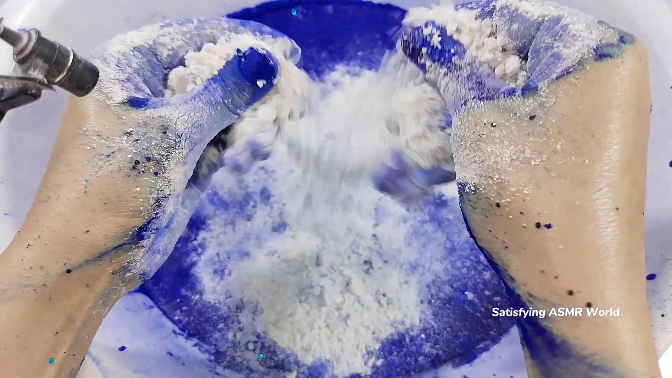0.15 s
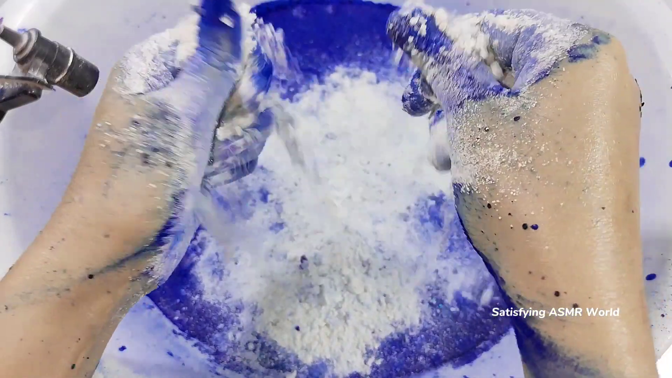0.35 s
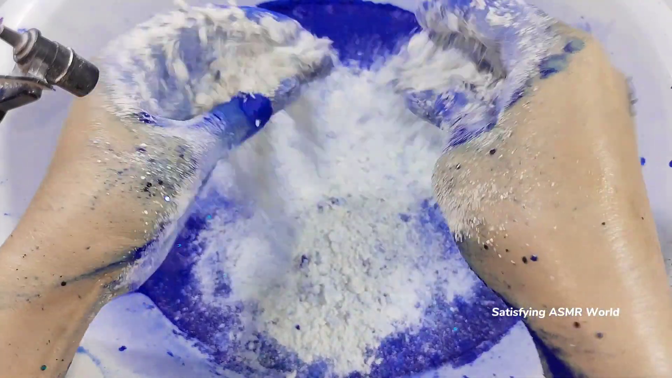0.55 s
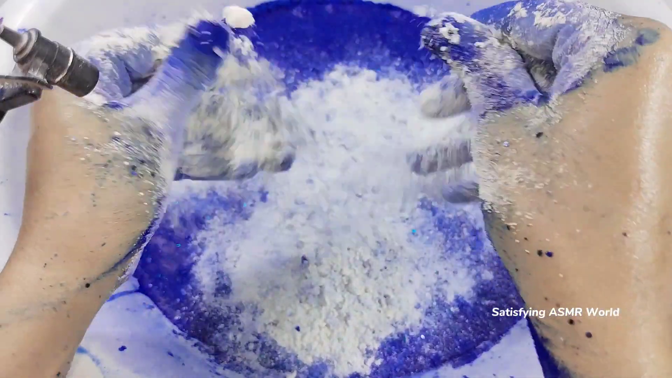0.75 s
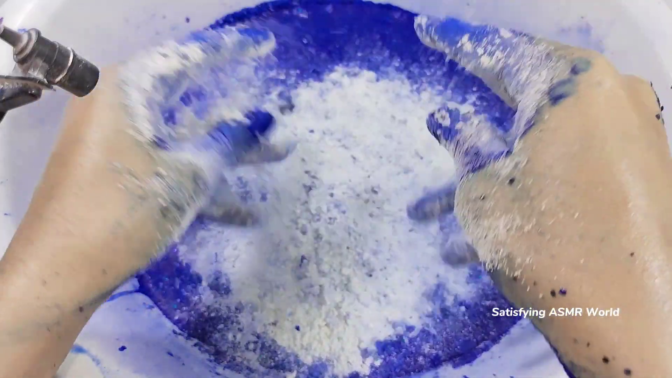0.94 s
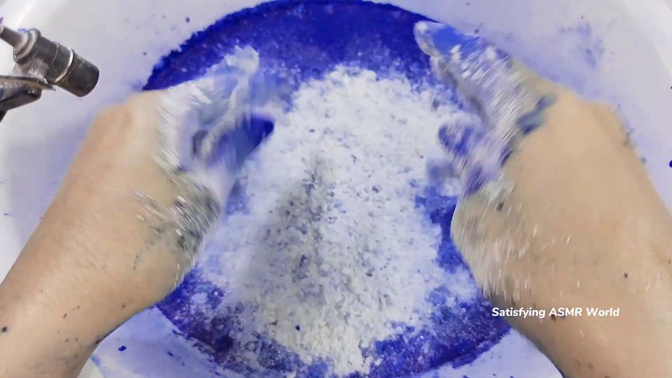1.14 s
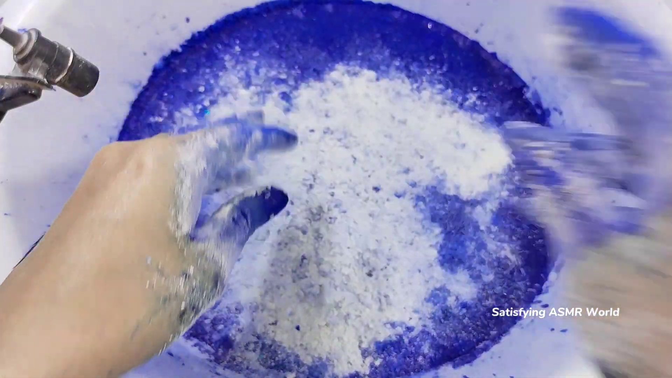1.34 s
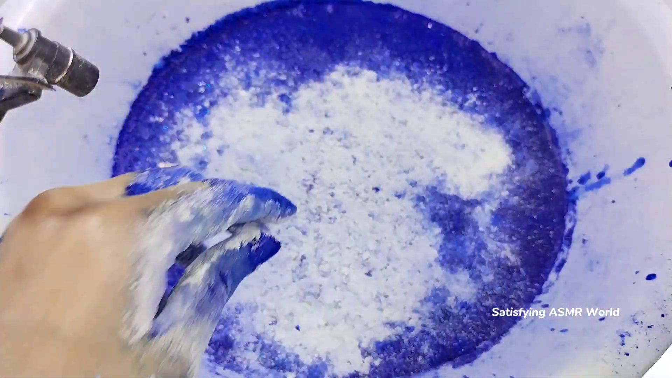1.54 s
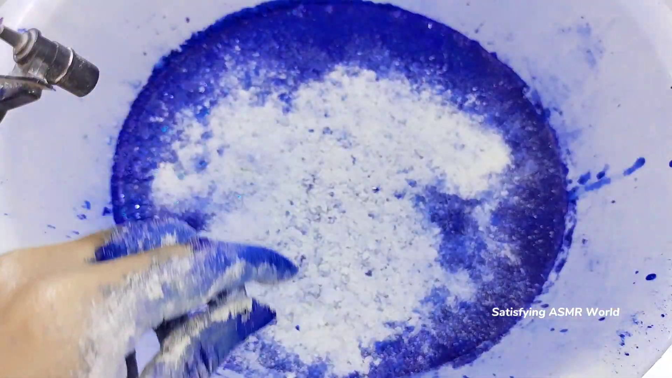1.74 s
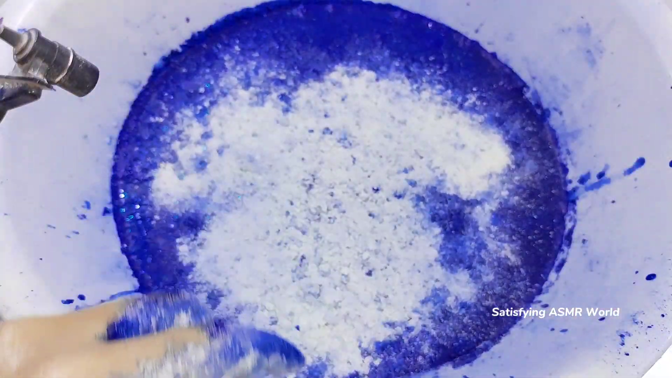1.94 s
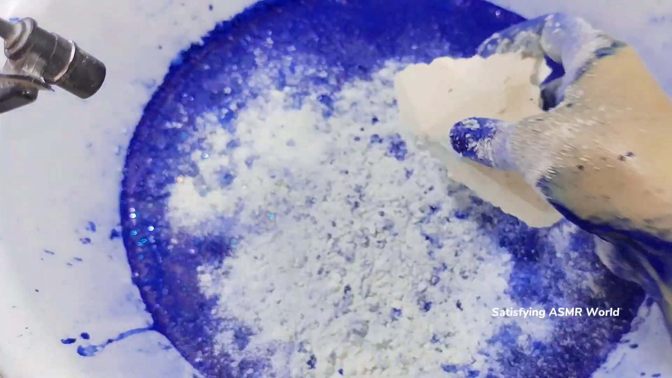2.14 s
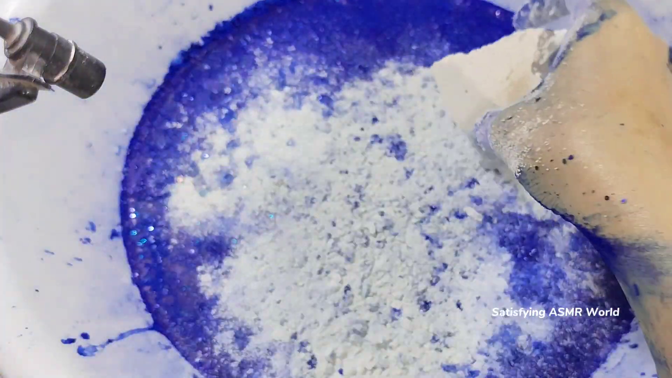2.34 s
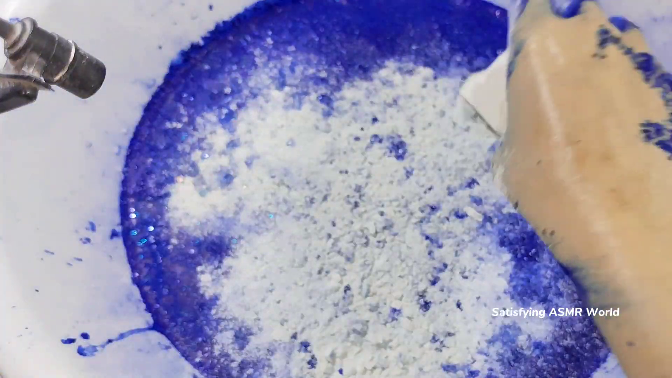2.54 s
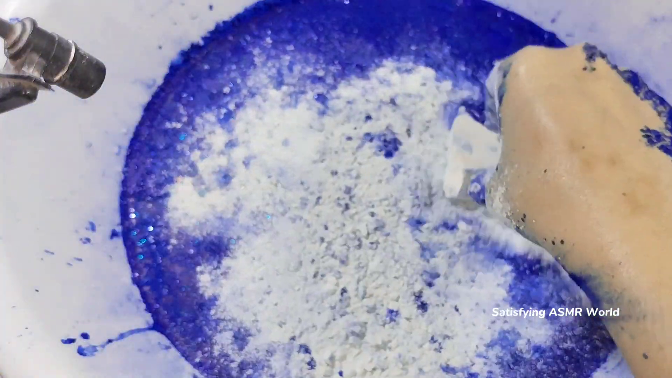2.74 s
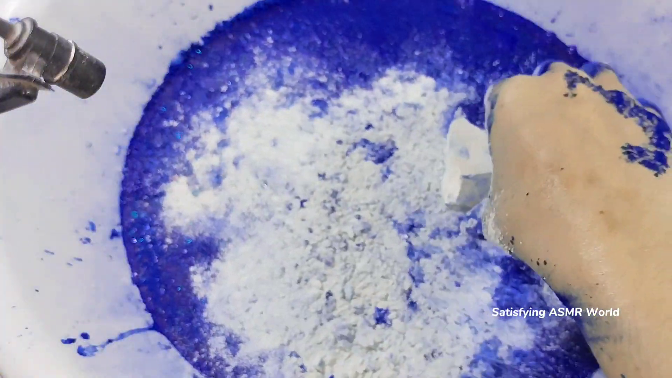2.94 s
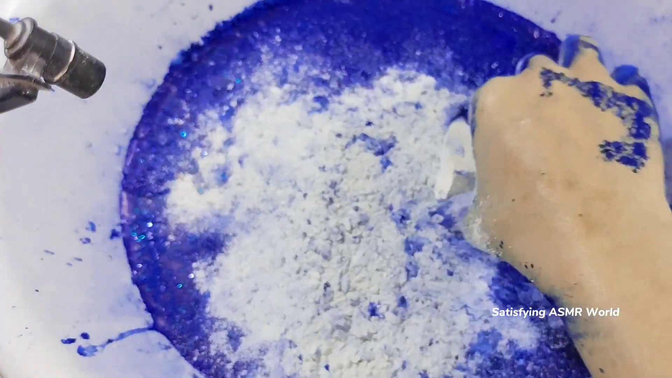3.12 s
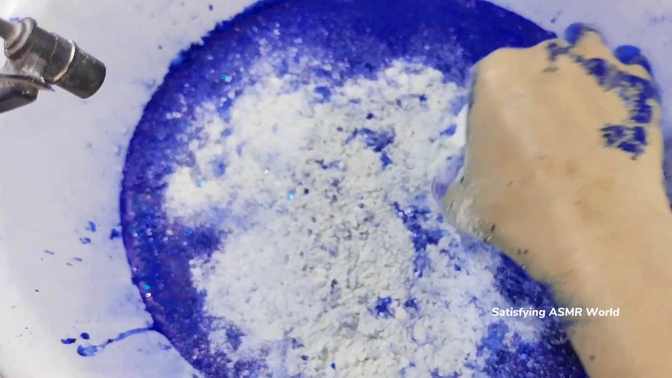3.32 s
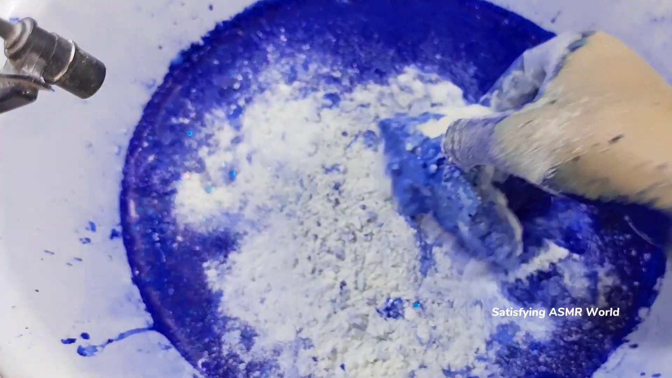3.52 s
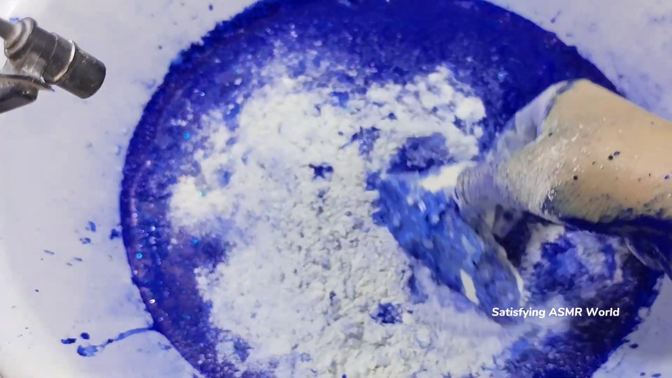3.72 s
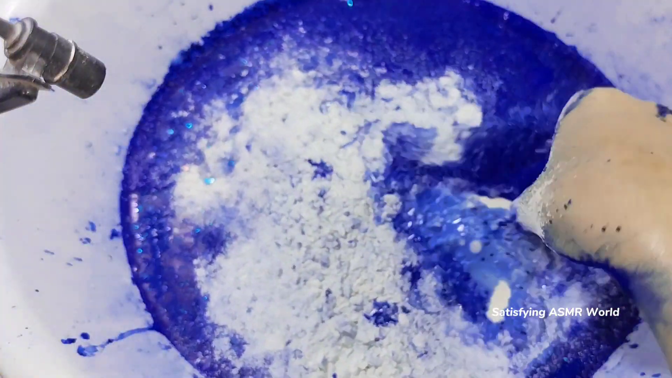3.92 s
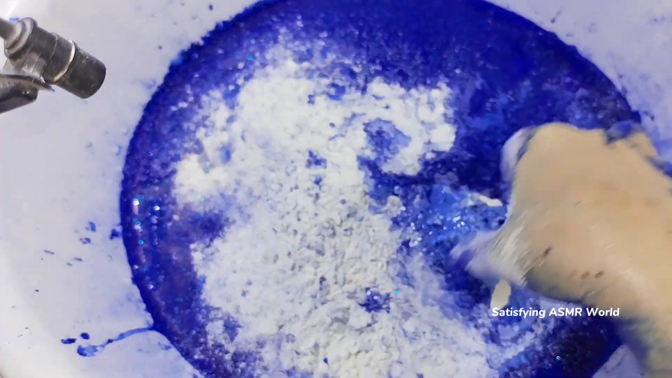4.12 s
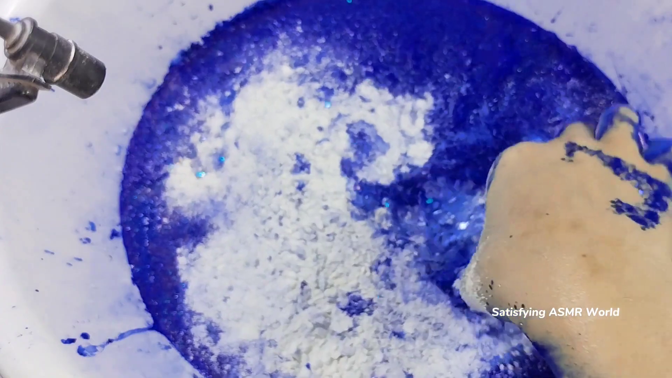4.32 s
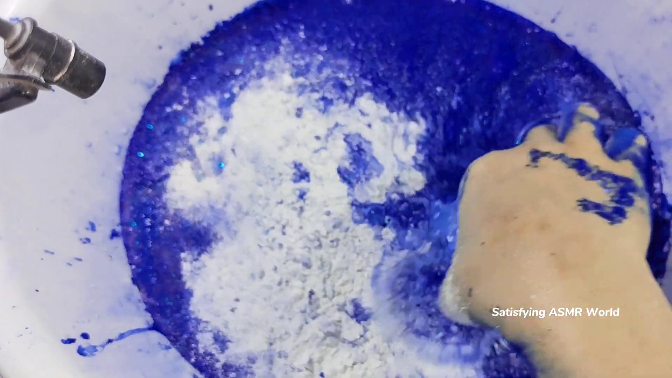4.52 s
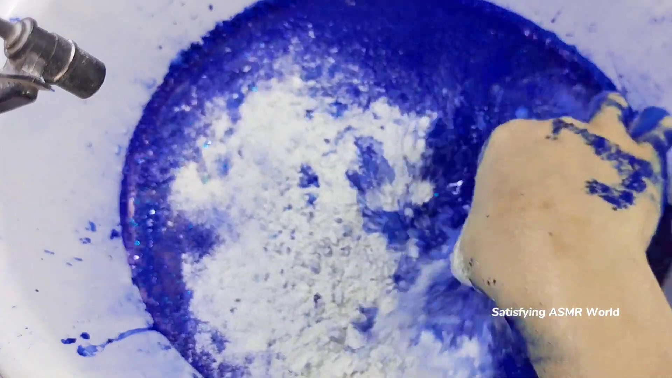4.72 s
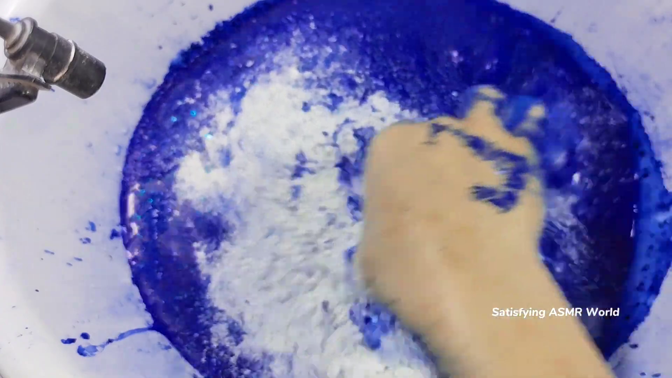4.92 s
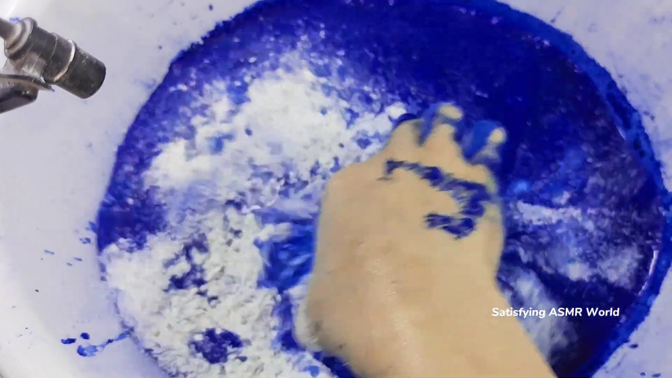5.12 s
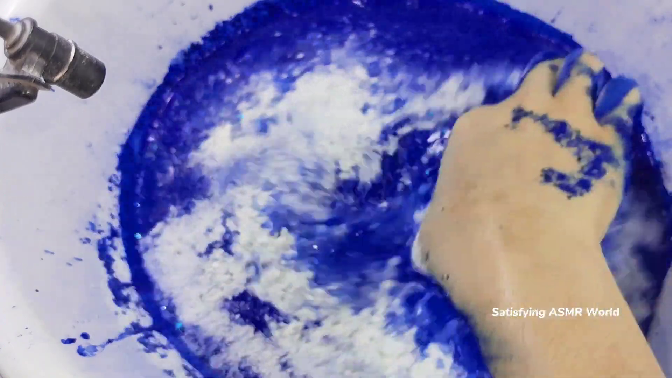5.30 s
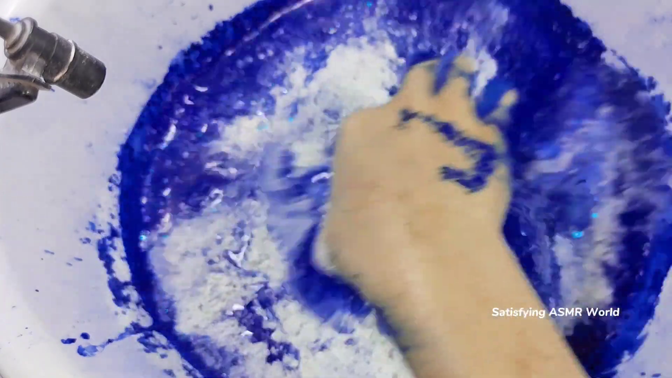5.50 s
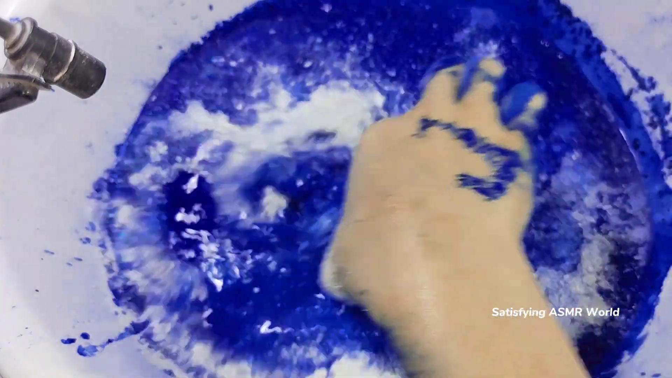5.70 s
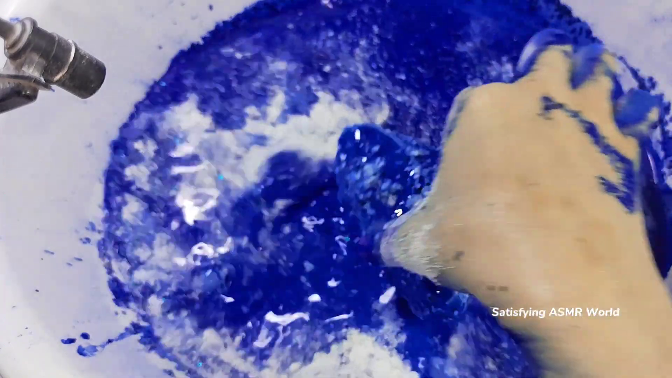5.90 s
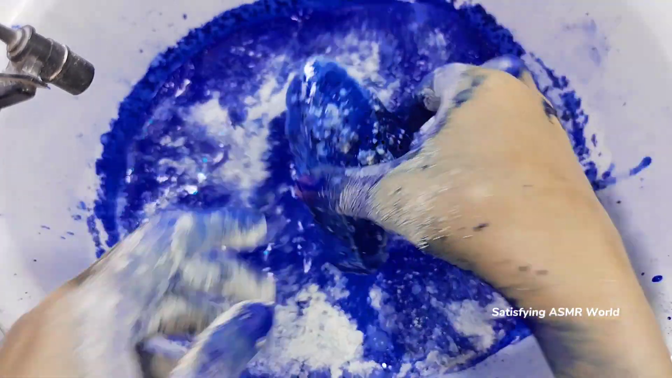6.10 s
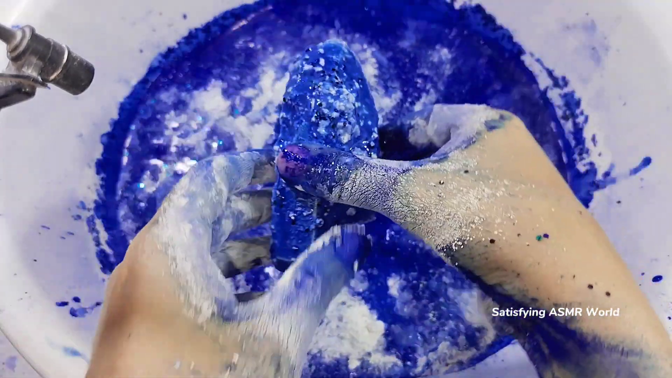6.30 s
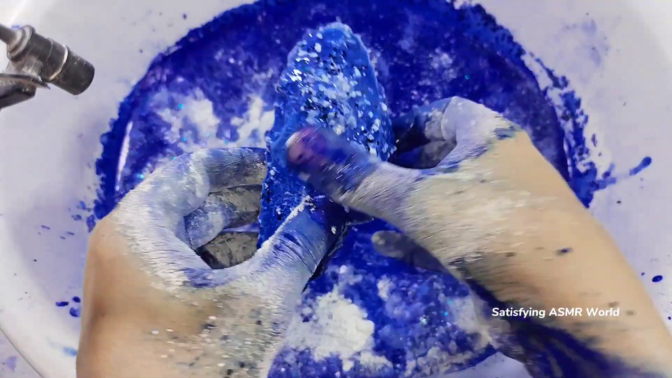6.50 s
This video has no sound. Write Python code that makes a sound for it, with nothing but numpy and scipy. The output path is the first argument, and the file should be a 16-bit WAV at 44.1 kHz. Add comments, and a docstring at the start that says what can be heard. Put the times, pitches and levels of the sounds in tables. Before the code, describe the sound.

Recorded very close in a small hard room with a short echo and faint low room tone. From 0 to 1.3 s, two hands crush soft damp chalk: dense, bright, gritty crunches in about eight overlapping squeezes, with sharp snaps, small pops and low rumble as lumps drop; the strongest crack is near 1.2 s. It falls almost quiet, with a faint powdery hiss and a dull soft knock at 1.6 s. From 2.0 s a block rubs through powder in hissing, rasping strokes, strongest around 2.2 s, with faint breathy squeaks. Low basin thuds come around 2.95 s and 3.35 s, then wet squelches and scrapes until about 4.2 s. After a lull, water sloshes and gurgles from 4.6 s, with a bright pop at 5.0 s, thinning into fizzing, crackling swishes. Sharp wet clicks stand out around 6.15 s, and fine crackle fades to the end.

```python
"""Soft wet chalk crunches between two hands, then a block hisses and squeaks through powder, bumps the
bottom of a plastic basin and is swished about in water that fizzes and pops, close by in a small hard room.
Chalk, powder and froth are many tiny damped rings, swelled and coloured push by push.
Cracks and air pockets are short rings with noisy bursts; the basin is a set of ringing tones plus rumble.
A short echo and a quiet room tone lie behind."""
import sys
import numpy as np
from scipy import signal
from scipy.fft import rfft, irfft
from scipy.io import wavfile
from scipy.ndimage import uniform_filter1d

SR = 44100
rng = np.random.default_rng(int(sys.argv[2]) if len(sys.argv) > 2 else 0)


def wav_out(sig):
    """Save sig, one row per channel (or a flat mono array), as 16-bit PCM at SR to the path in sys.argv[1]."""
    wavfile.write(sys.argv[1], SR, np.round(np.clip(np.atleast_2d(sig).T, -1, 1) * 32767).astype(np.int16))


N = 288855
TIME = np.arange(N) / SR


def crumbling():
    """Dense, crisp fractures and a few larger crumbs breaking as the lumps give way between the fingers."""
    # colour of the crunch: f/Hz, level/dB
    crumble_tone = [(210, -27), (350, -18), (458, -11.5), (591, -1), (798, -10), (966, -6.5), (1210, -14),
                    (1850, -5), (3660, -7), (4220, -3.5), (9940, -10.5), (14300, -12.5), (15500, -12.5)]
    # squeezes of the lumps, before the trim: start t/s, rise/s, hold/s, fade t60/s, crunch level/dB,
    # fine grit level/dB
    squeezes = [(0.0, 0.004, 0.085, 0.4, -35, -34), (0.089, 0.099, 0.066, 0.84, -32.5, -34),
                (0.329, 0.075, 0.13, 0.15, -36.5, -35), (0.538, 0.015, 0.13, 0.41, -39.5, -39),
                (0.691, 0.045, 0.048, 0.72, -34, -33), (0.817, 0.052, 0.02, 0.42, -36.5, -36.5),
                (0.976, 0.021, .16, 0.46, -36, -33), (1.225, 0.036, 0.02, 0.42, -50, -49.5),
                (1.231, 0.03, 0.0046, 0.043, -41.5, -29.5)]
    low_edge_hz = 388  # lower edge of the crunch
    trim_db = -0.18
    fractures = grains(per_s=7000, spread_db=3.5, cycles=2.2, glide=0, wash=0.79)
    crumbs = grains(per_s=280, spread_db=4.5, cycles=1.8, glide=0, wash=0, count=16)
    crunch = clumped(fractures + 0.5 * crumbs, depth_db=2.5, size=300)
    pushes = [(*squeeze, low_edge_hz) for squeeze in squeezes]
    return gain_of(trim_db) * stroke(crunch, crumble_tone, pushes, linger=1.0, split_hz=3970,
                                     patchy_db=2.5, edge_db=-8.0)


def rubbing():
    """Fine powder hisses along the block; wet paste squelches as it is squeezed aside beneath."""
    # colours of the rub and of the paste: f/Hz, level/dB
    rub_tone = [(710, -45), (1200, -4), (1650, -8.5), (1840, -10), (2030, -3), (2380, -10), (2510, -4.5),
                (3210, -4), (3850, -1.5), (5790, 0.5), (15500, -9)]
    squelch_tone = [(150, -29), (260, -14), (302, -5), (414, 4), (620, 8), (880, 3), (980, 5.5),
                    (1300, -23), (1690, -28), (2860, -120)]
    # slides through the powder, before the trim: start t/s, rise/s, hold/s, fade t60/s, rasp level/dB,
    # hiss level/dB, lower edge of the sound f/Hz; the hiss fades more slowly, by the factor linger
    slides = [(1.335, 0.013, 0.035, 0.52, -68, -49.5, 3800), (1.462, 0.017, 0.17, 0.2, -57.5, -54, 2580),
              (1.995, 0.023, 0.035, 0.39, -44, -43, 1620), (2.1, 0.1, 0.072, 0.27, -31.5, -34, 1440),
              (2.341, 0.017, .01, 0.57, -44.5, -43.5, 2130), (2.616, .012, 0.0067, 0.13, -58, -53.5, 2370),
              (2.65, 0.033, 0.009, 0.75, -42, -40.5, 2030), (2.747, 0.047, 0.0092, 0.29, -35, -34.5, 2110),
              (2.929, .02, 0.07, 0.17, -46.5, -46, 2314), (3.327, 0.072, 0.0048, 0.087, -35.5, -31.5, 1670),
              (3.403, 0.044, .01, 0.41, -41.5, -41.5, 1550),
              (3.586, 0.045, 0.013, 0.21, -35.5, -35.5, 1950),
              (3.697, 0.031, 0.17, 0.24, -50.5, -49.5, 2360), (3.91, 0.0077, 0.089, 0.34, -40, -38, 1040),
              (3.944, 0.037, .004, 0.051, -56, -30, 1190), (4.23, 0.0095, 0.0088, .22, -56.5, -69, 4200),
              (4.33, 0.023, 0.045, 0.29, -57, -52, 3230), (4.563, 0.01, .03, 0.4, -56, -51.5, 2760)]
    # squelches of the paste, before the trim: start t/s, rise/s, hold/s, level/dB
    squelches = [(2.755, 0.013, 0.028, -49.5), (2.825, 0.015, 0.042, -45.5), (3.34, .008, 0.11, -38.5),
                 (3.905, 0.027, .04, -44.5), (3.985, 0.011, 0.064, -38), (4.75, 0.16, .03, -38)]
    squelch_t60 = 0.2  # s
    rasp_trim_db, paste_trim_db = -1.97, -7.5
    grit = grains(per_s=3500, spread_db=3.0, cycles=2.6, glide=0, wash=1.14)
    paste = grains(per_s=2200, spread_db=1.5, cycles=6.1, glide=0.024, wash=0.68)
    squelch = tinted(paste, squelch_tone) * swells(squelches, squelch_t60)
    rasp = stroke(grit, rub_tone, slides, linger=1.37, split_hz=4230, patchy_db=5.0, edge_db=10.5)
    return gain_of(rasp_trim_db) * rasp + gain_of(paste_trim_db) * squelch


def squeaks():
    """The block sticks and slips lightly; narrow bands of noise give a faint, fuzzy whistle."""
    # squeaks: start t/s, level/dB, pitch f/Hz, length/s
    squeak_list = [(1.388, -44, 3980, 0.023), (2.328, -49.5, 2550, 0.24), (3.227, -55, 1853, 0.28),
                   (3.889, -41, 2810, 0.024), (4.453, -59, 1635, 0.085)]
    out = np.zeros(N)
    for start, db, hz, length in squeak_list:
        age = np.clip((TIME - start) / length, 0, 1)
        whistle = evened(band(rng.standard_normal(N), 0.95 * hz, 1.05 * hz))
        # a quick rise and a slow fall
        out += gain_of(db) * whistle * np.sin(np.pi * age ** 0.28)
    return out


def water():
    """Clumps of wet crackle, stray ticks and small bubbles, each rising in pitch as it surfaces."""
    # colour of the slosh and fizz: f/Hz, level/dB
    slosh_tone = [(210, -64), (350, -37), (437, 3.5), (488, -20), (591, 9), (715, -4), (851, 1),
                  (1170, -9.5), (1330, -5.5), (1910, -0.5), (2420, -8), (6580, -12), (15500, -23)]
    # swishes and spells of draining, before the trim: start t/s, rise/s, hold/s, slosh level/dB,
    # fizz level/dB, lower edge of the sound f/Hz
    swishes = [(4.63, 0.028, 0.0061, -41, -50.5, 486), (4.704, 0.045, 0.11, -35.5, -47.5, 372),
               (4.895, 0.038, 0.16, -45, -43, 404), (5.101, 0.086, 0.019, -45.5, -40, 584),
               (5.235, 0.071, 0.098, -55, -45, 2070), (5.359, 0.011, 0.0073, -39, -44, 505),
               (5.432, 0.021, 0.015, -47.5, -44.5, 525), (5.513, 0.035, 0.041, -52, -38.5, 900),
               (5.627, .015, 0.042, -44.5, -41.5, 694), (5.753, 0.022, 0.0066, -42.5, -37.5, 830),
               (5.858, 0.057, 0.048, -60, -44.5, 1380), (5.983, 0.037, 0.29, -58, -42.5, 2080),
               (6.35, 0.11, .17, -57, -45.5, 4330)]
    slosh_t60, fizz_linger = 0.27, 2.97  # slosh fade in s; the fizz fade is so many times longer
    trim_db = -1.0
    crackle = grains(per_s=2000, spread_db=2.0, cycles=2.7, glide=0, wash=1.0)
    ticks = grains(per_s=160, spread_db=2.0, cycles=4.3, glide=0, wash=0)
    bubbles = grains(per_s=750, spread_db=1, cycles=9.3, glide=0.033, wash=0)
    froth = clumped(crackle + 0.6 * ticks + 0.28 * bubbles, depth_db=1.5, size=420)
    pushes = [(start, rise, hold, slosh_t60, slosh_db, fizz_db, low_edge_hz)
              for start, rise, hold, slosh_db, fizz_db, low_edge_hz in swishes]
    return gain_of(trim_db) * stroke(froth, slosh_tone, pushes, linger=fizz_linger, split_hz=2640,
                                     patchy_db=3.8, edge_db=-5.0)


def snaps():
    """A sharp crack excites a heavily damped cavity, too small to radiate far below its pitch."""
    # brittle cracks and wet clicks: t/s, level/dB over 10 ms before the trim, pitch f/Hz, t60/s
    snap_list = [(0.03, -23, 4600, 0.034), (0.0606, -24, 3920, 0.03), (0.2014, -31.5, 5400, 0.0082),
                 (0.2748, -25, 4300, 0.028), (0.4315, -36.5, 2620, 0.0048), (0.4916, -25.5, 2900, 0.014),
                 (0.738, -21.5, 4040, 0.017), (0.934, -30.5, 3950, 0.013), (1.066, -33.5, 5750, 0.0062),
                 (1.1078, -31, 4900, 0.0033), (1.006, -22, 4900, 0.024), (1.1324, -31, 5360, 0.016),
                 (1.168, -27, 6970, 0.005), (1.2075, -14, 5530, 0.0039), (3.3396, -33, 11100, 0.0056),
                 (3.9811, -28, 6450, 0.004), (4.0365, -35.5, 2600, 0.012), (4.34, -37, 14320, 0.0058),
                 (4.3536, -38.5, 4840, 0.026), (4.5076, -41, 5500, 0.019), (4.5764, -29.5, 4950, 0.015),
                 (4.6167, -43, 5840, 0.011), (5.0051, -41, 5670, 0.0054), (5.0206, -22.5, 5770, 0.016),
                 (5.8385, -34.5, 6660, 0.01), (5.802, -36, 4380, 0.007), (6.035, -32, 3000, 0.0051),
                 (6.1293, -24.5, 10000, 0.0027), (6.1774, -20.5, 6400, 0.017), (6.21, -30, 4660, 0.017),
                 (6.376, -36.5, 11600, 0.011), (6.5031, -34, 7770, 0.0074)]
    trim_db = -5.17
    out = np.zeros(N)
    t = np.arange(SR // 20) / SR
    for start, db, hz, t60 in snap_list:
        fade = gain_of(-60 * t / t60)
        ring = np.sin(2 * np.pi * hz * t) * fade
        crack = splinters(fade, hz, sharpness=6.6) + 0.25 * evened(ring)
        add(out, start, db, band(crack, 0.38 * hz, SR / 2))
    return gain_of(trim_db) * out


def pops():
    """A trapped pocket of air rings briefly upward under a wet splat."""
    # air pockets bursting and gurgling: t/s, level/dB over 10 ms before the trim, pitch f/Hz, t60/s
    pop_list = [(0.4315, -26, 720, 0.0022), (0.6441, -23, 670, 0.01), (0.933, -34, 1160, 0.0018),
                (1.0607, -31.5, 890, 0.03), (1.098, -29, 1410, 0.013), (1.2072, -29, 1660, 0.022),
                (1.2282, -21.5, 1400, 0.005), (2.879, -35, 431, 0.061), (4.036, -28, 727, 0.0095),
                (4.7923, -30.5, 960, 0.0037), (4.799, -40, 210, 0.096), (4.827, -56, 315, 0.039),
                (4.869, -33.5, 710, 0.017), (4.893, -49, 300, 0.05), (4.9351, -31, 686, 0.018),
                (4.947, -39.5, 220, 0.1), (4.975, -42, 165, 0.1), (5.013, -37, 1320, 0.017),
                (5.019, -20.5, 891, 0.034), (5.025, -32, 1020, 0.0094), (5.1489, -34.5, 730, 0.027),
                (5.3748, -27.5, 1590, 0.019), (5.4073, -35.5, 1700, 0.015), (5.579, -32.5, 855, 0.038),
                (5.6432, -36, 1320, 0.014), (5.8929, -39, 2010, 0.026), (6.0375, -33.5, 2290, 0.03),
                (6.2692, -38, 2500, 0.025)]
    trim_db = -3.5
    out = np.zeros(N)
    t = np.arange(SR // 10) / SR
    for start, db, hz, t60 in pop_list:
        fade = gain_of(-60 * t / t60)
        ring = np.sin(2 * np.pi * hz * t * (1 + 0.06 * t / t60)) * fade
        splat = splinters(fade, hz, sharpness=2.3)
        add(out, start, db, band(evened(ring) + 0.78 * splat, 0.52 * hz, 2.68 * hz))
    return gain_of(trim_db) * out


def basin():
    """Thuds on the basin, its rumble under lumps and moving water, and one dull knock beside it."""
    # colours of the rumble and of the knock: f/Hz, level/dB
    rumble_tone = [(25, -41), (45, -32), (70, -1), (110, 3), (160, 1.5), (220, -8.5), (300, -15),
                   (450, -44), (800, -78)]
    knock_tone = [(150, -30), (400, -8.5), (520, 0), (640, -7), (770, -47), (900, -11), (1170, -12.5),
                  (2600, -29.5), (4000, -44)]
    # lumps and moving water shaking the basin, before the trim: start t/s, rise/s, hold/s, level/dB
    tremors = [(0.0, 0.023, 0.46, -44), (0.615, 0.041, 0.034, -48.5), (0.805, 0.027, 0.061, -41),
               (0.95, 0.043, 0.022, -52), (1.185, 0.0053, 0.02, -48), (3.0, 0.022, .13, -49),
               (3.345, 0.014, .01, -36.5), (3.41, .025, .01, -54), (4.57, 0.14, 0.24, -53.5)]
    # blows on the basin: t/s, level/dB over 10 ms, contact time/s, factor on the ring time
    bumps = [(0.2735, -22, 0.0011, 0.02), (2.9444, -29.5, 0.0013, 0.67), (2.951, -33, 0.0087, 0.93),
             (2.97, -27.5, 0.0024, 0.43), (3.028, -37, 0.0069, 0.6), (3.3455, -36, 0.00077, 0.94),
             (3.373, -38, 0.0024, 0.44), (3.848, -54, 0.0089, 0.81), (4.334, -56.5, 0.0035, 0.5),
             (4.586, -51.5, 0.019, 1), (6.53, -56, 0.0052, 0.9)]
    tremor_t60, rumble_trim_db = 0.45, 1.0  # s, dB
    knock_s, knock_db, knock_rise_s, knock_t60 = 1.6145, -38.5, 0.002, 0.25
    rumble = tinted(rng.standard_normal(N), rumble_tone)
    out = gain_of(rumble_trim_db) * rumble * swells(tremors, tremor_t60)
    for start, db, contact_s, ring in bumps:
        add(out, start, db, struck(contact_s, ring))
    t = np.arange(SR // 2) / SR
    knock = tinted(rng.standard_normal(len(t)), knock_tone)
    knock_shape = gain_of(-60 * t / knock_t60) * (1 - np.exp(-t / knock_rise_s))
    add(out, knock_s, knock_db, knock * knock_shape)
    return out


def struck(contact_s, ring):
    """The basin's own tones rung by a push; a long contact leaves only the low ones."""
    # tones of the basin: f/Hz, level/dB, t60/s before the ring factor
    basin_modes = [(82, -3, 0.052), (99.3, 9.5, 0.18), (125, -9.5, 0.3), (150, -14.5, 0.24),
                   (185, -2.5, 0.35), (360, -6, 0.052), (584, -7.5, 0.17), (634, -3.5, 0.24)]
    t = np.arange(SR // 2) / SR
    sound = np.zeros(len(t))
    for hz, db, t60 in basin_modes:
        fade = gain_of(db - 60 * t / (t60 * ring))
        sound += fade * np.sin(2 * np.pi * hz * t) / (1 + (hz * contact_s) ** 4)
    onset = 1 - np.exp(-2 * t / contact_s)
    high_pass = signal.butter(3, 82, "high", fs=SR, output="sos")
    return signal.sosfilt(high_pass, sound * onset)


def stroke(x, tone, pushes, linger, split_hz, patchy_db, edge_db, size=1024):
    """Plays a texture push by push: coarse and fine parts swell, and each push has its own low cut-off."""
    coarse_power, fine_power, edge_sum = np.zeros((3, N))
    for start, rise, hold, t60, coarse_db, fine_db, low_edge_hz in pushes:
        power = gain_of(coarse_db) ** 2 * (swell(start, rise, hold, t60) + 1e-12)
        coarse_power += power
        fine_power += gain_of(fine_db) ** 2 * swell(start, rise, hold, t60 * linger)
        edge_sum += power * np.log(low_edge_hz)
    hz, t, z = signal.stft(x, SR, nperseg=size, noverlap=size * 3 // 4)
    hz = hz[:, None] + 1  # avoids dividing by zero
    # the stronger a push is at the moment, the more it sets the low cut-off
    below = np.exp(np.interp(t, TIME, edge_sum / coarse_power)) / hz
    # a narrow peak or dip at the cut-off, and a steep fall beneath it
    edge = edge_db * np.exp(-(np.log(below) / 0.014) ** 2)
    shape = gain_of(read(tone, hz) + edge) / np.sqrt(1 + below ** 20)
    # the quieter the sound, the blotchier its colour
    level_db = 10 * np.log10(np.interp(t, TIME, np.maximum(coarse_power, fine_power)))
    quietness = np.clip((-26 - level_db) / 20, 0.2, 1)
    patches = uniform_filter1d(rng.standard_normal(z.shape), size=6, axis=0)
    patches = uniform_filter1d(patches, size=15, axis=1)
    shape = shape * gain_of(patchy_db * quietness * evened(patches))
    # the parts below and above split_hz each follow their own level
    fine = 1 / (1 + (split_hz / hz) ** 8)
    out = np.zeros(N)
    for share, power in [(1 - fine, coarse_power), (fine, fine_power)]:
        # the small second term keeps a nearly empty part from being blown up
        size_of_part = np.sqrt(np.mean(shape ** 2 * share, 0) + np.mean(shape ** 2, 0) / 100)
        part = z * shape * share / size_of_part
        sound = signal.istft(part, SR, nperseg=size, noverlap=size * 3 // 4)[1][:N]
        out += np.sqrt(power) * sound
    return out


def grains(per_s, spread_db, cycles, glide, wash, count=36):
    """Tiny damped rings of many pitches and sizes over a wash of noise, like countless smaller ones."""
    out = np.zeros(N)
    pitches = np.geomspace(350, 16000, count)
    shares = np.sqrt(pitches) / np.sqrt(pitches).sum()
    for hz, share in zip(pitches, shares):
        # age counts decay times: the ring fades by a factor e every so many cycles
        age = np.arange(int(6 * cycles * SR / hz)) * hz / SR / cycles
        ring = np.exp(-age) * np.sin(2 * np.pi * cycles * (age + glide * age ** 2 / 2))
        # random waits, sizes and signs
        wait, size, sign = rng.random((6000, 3)).T
        at = (np.cumsum(-np.log(1 - wait)) / (per_s * share) * SR).astype(int)
        size = gain_of(spread_db * np.minimum(-np.log(1 - size), 4)) * np.sign(sign - 0.5)
        clicks = np.bincount(at[at < N], size[at < N], N)
        out += np.sqrt(hz) * evened(signal.oaconvolve(clicks, ring)[:N])
    return evened(evened(out) + wash * rng.standard_normal(N))


def clumped(x, depth_db, size):
    """Grains come in small avalanches, about size samples long."""
    avalanches = uniform_filter1d(rng.standard_normal(N), size=size)
    avalanches = uniform_filter1d(avalanches, size=size // 3)
    return evened(x * gain_of(depth_db * evened(avalanches)))


def splinters(fade, hz, sharpness):
    """A dying burst of micro-cracks in a cavity at hz."""
    cracks = rng.choice([-1, 1], len(fade)) * fade
    b, a = signal.iirpeak(hz, sharpness, fs=SR)
    return evened(signal.lfilter(b, a, cracks))


def swell(start, rise, hold, t60):
    """Power of one push of the hand: it builds smoothly, holds, then dies away."""
    t = TIME[::64]  # coarse steps, joined up below
    build = np.sin(np.pi / 2 * np.clip((t - start) / rise, 0, 1)) ** 2
    fade = gain_of(-60 * np.clip((t - start - rise - hold) / t60, 0, 2))
    return np.interp(TIME, t, (build * fade) ** 2)


def swells(rows, t60):
    """Gain over time of overlapping pushes (start, rise, hold, dB), whose powers add."""
    return np.sqrt(sum(gain_of(db) ** 2 * swell(start, rise, hold, t60) for start, rise, hold, db in rows))


def add(mix, start, db, sound):
    """Mixes in a hit at start seconds, with the level db over its first 10 ms."""
    part = mix[round(start * SR):][:len(sound)]
    part += gain_of(db) * sound[:len(part)] / np.sqrt(np.mean(sound[:SR // 100] ** 2))


def gain_of(db):
    """Decibels to gain."""
    return 10 ** (np.asarray(db) / 20)


def evened(x):
    """Scales to an rms (average strength) of 1."""
    return x / np.sqrt(np.mean(x ** 2) + 1e-20)


def read(points, hz):
    """Reads a table's value at hz, on a log frequency axis."""
    f, value = np.transpose(points)
    return np.interp(np.log(hz + 1), np.log(f + 1), value)


def tinted(x, tone):
    """Colours x with a fixed spectrum, at rms 1."""
    hz = np.fft.rfftfreq(len(x), 1 / SR)
    return evened(irfft(rfft(x) * gain_of(read(tone, hz)), len(x)))


def band(x, low_hz, high_hz):
    """Band-pass with steep skirts."""
    edges = [low_hz, min(high_hz, SR / 2 - 1000)]
    return signal.sosfilt(signal.butter(3, edges, "band", fs=SR, output="sos"), x)


def room(x):
    """A short diffuse echo of decaying noise, each band dying at its own speed."""
    # fade time of the echo: f/Hz, t60/s
    room_t60 = [(150, 0.44), (1000, 0.36), (5000, 0.22), (14000, 0.12)]
    hz, t, z = signal.stft(rng.standard_normal(SR // 2), SR, nperseg=256)
    fade = gain_of(-60 * t / read(room_t60, hz)[:, None])
    tail = signal.istft(z * fade, SR, nperseg=256)[1]
    tail[:SR // 300] = 0  # a short gap before the echo
    return signal.fftconvolve(x, tail / np.linalg.norm(tail))[:N]


def room_tone():
    """The steady quiet noise of the room, as coloured noise."""
    # colour of the room tone: f/Hz, level/dB
    air_tone = [(15, -25), (35, -7.5), (65, 1.5), (200, -2.5), (380, -9), (550, -12), (1100, -16),
                (3000, -22.5), (15500, -20.5)]
    return gain_of(-64) * tinted(rng.standard_normal(N), air_tone)


def scene():
    """All the handling, its echo, and the room tone."""
    near = crumbling() + rubbing() + squeaks() + water() + snaps() + pops() + basin()
    echo = gain_of(-15.5) * room(near)
    return (near + echo + room_tone())[None]


def record(dry):
    """Full-scale clipping, then a steep cut of everything above the band limit."""
    low_pass = signal.firwin(511, 15750, window=("kaiser", 9), fs=SR)  # limit in Hz
    return signal.oaconvolve(np.clip(dry, -1, 1), low_pass[None], "same")


dry = scene()
out = record(dry)
wav_out(out)
```